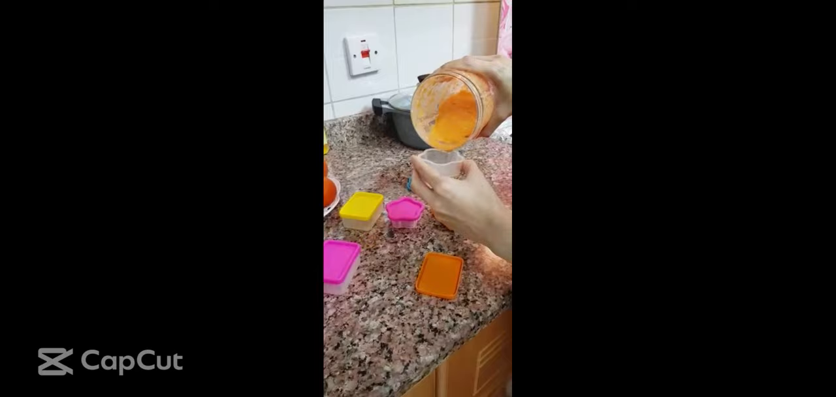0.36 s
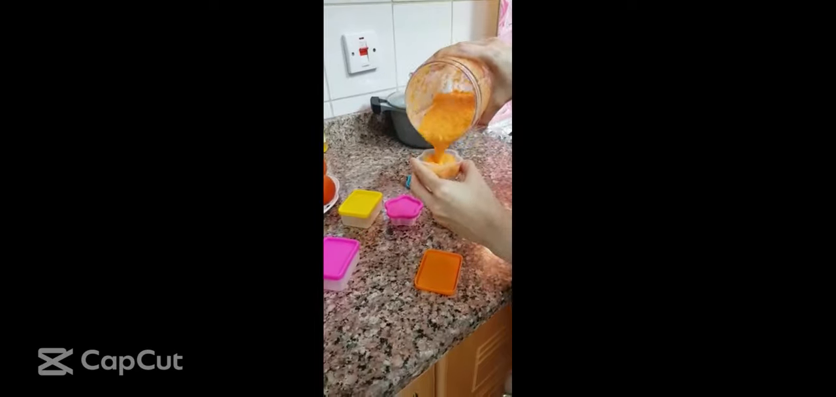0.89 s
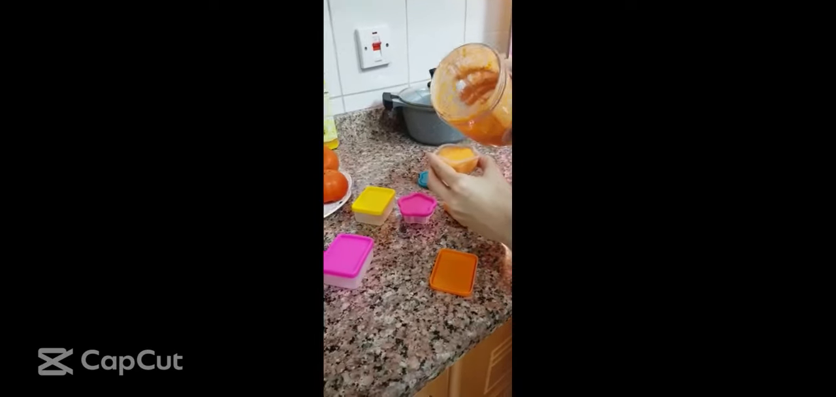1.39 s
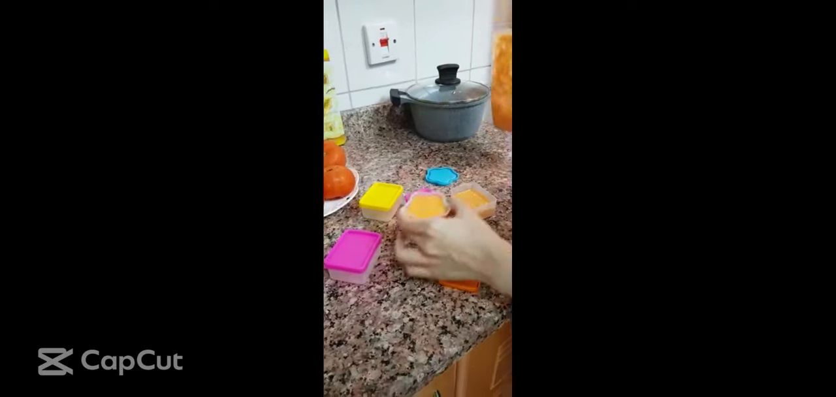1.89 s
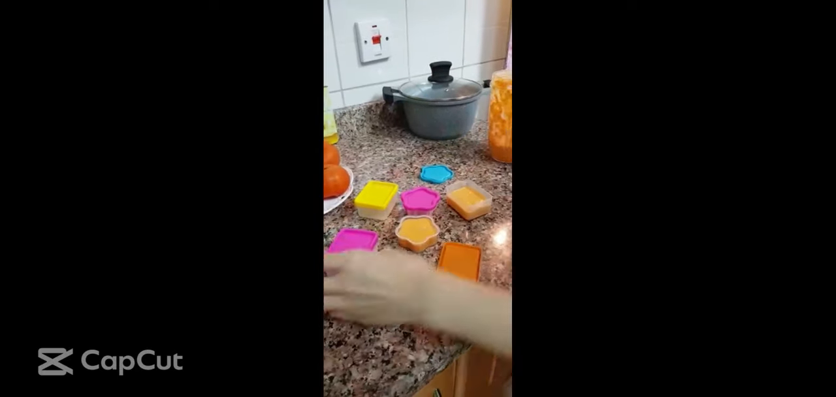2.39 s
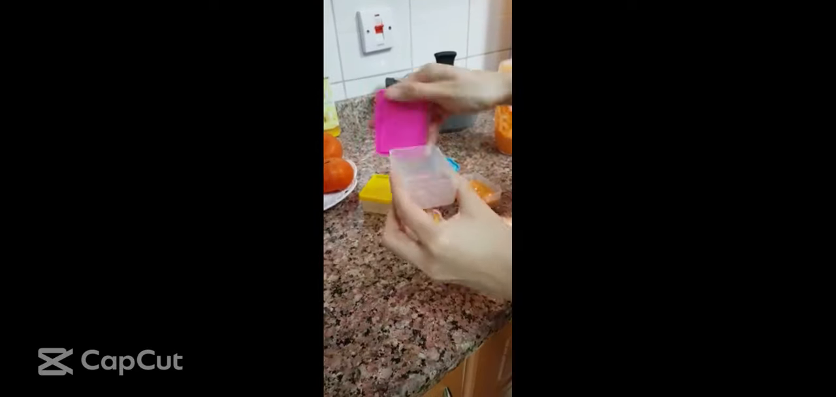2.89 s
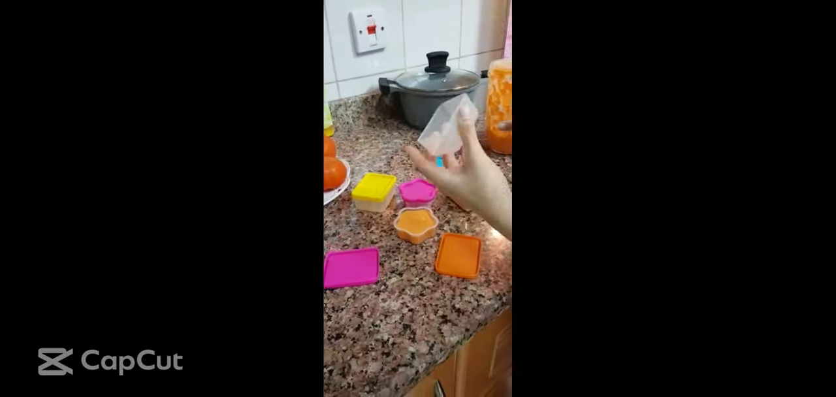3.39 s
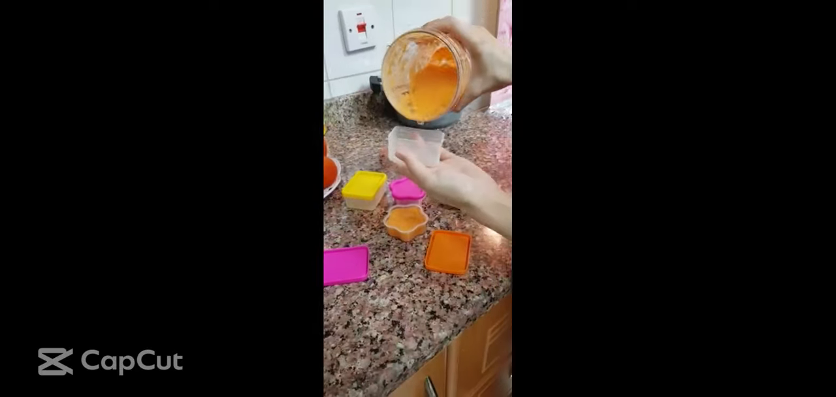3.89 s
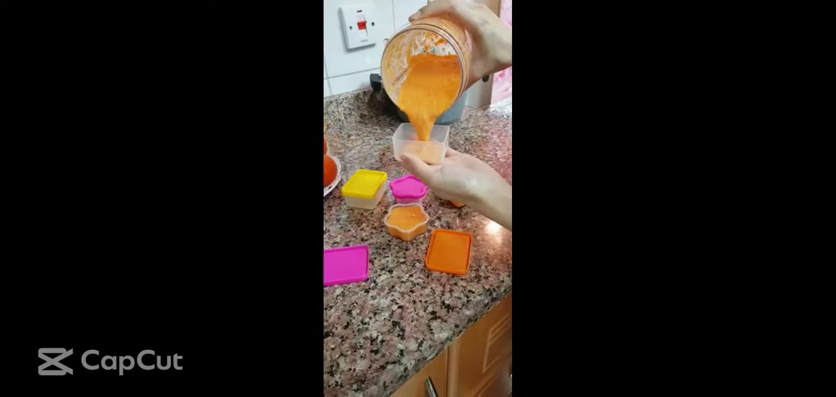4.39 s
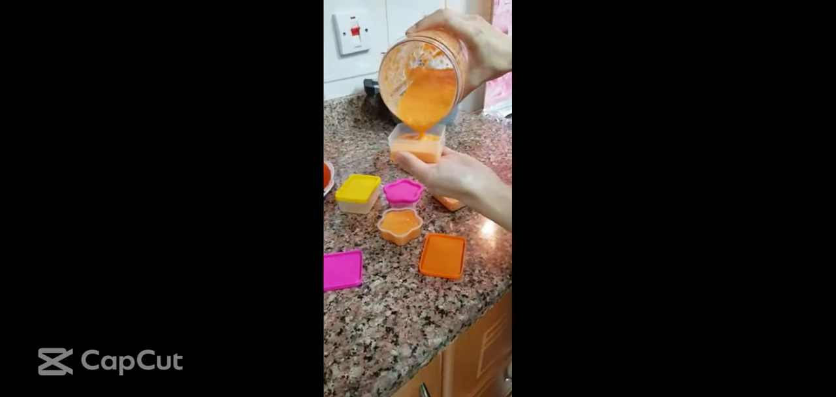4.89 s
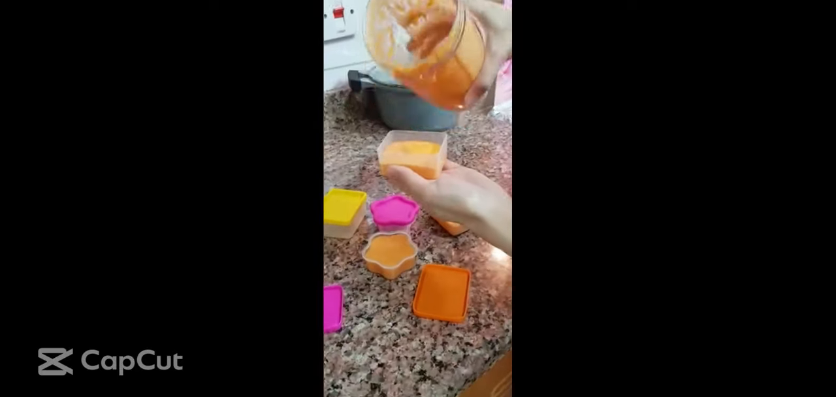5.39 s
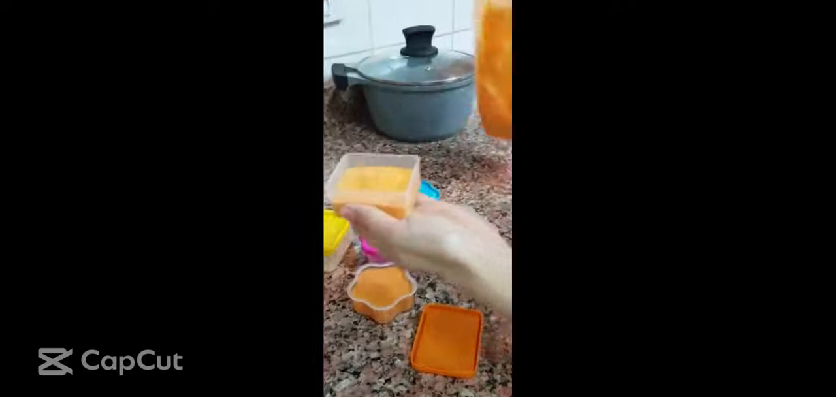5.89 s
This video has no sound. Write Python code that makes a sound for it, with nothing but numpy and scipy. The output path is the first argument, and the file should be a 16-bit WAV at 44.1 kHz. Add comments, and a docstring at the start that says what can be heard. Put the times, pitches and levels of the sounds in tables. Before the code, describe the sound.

A small tiled kitchen heard through a close phone microphone: quiet, uneven low rumble, a very faint motor hum and thin hiss throughout. Barely audible soft thumps come around 0.9 and 1.2 s. At 1.6 s a jar lands with one dull, low clunk and a little rattle. Fingers brush plastic at 2.1 s, then a tub knocks the stone in a tight hollow cluster at 2.2 s, again at 2.35 s, and lightly at 2.55 s. Around 2.9 s a box lid is prised up: a short creak rising into a sharp, loud snap at 2.95 s, louder on the left. From 3.14 to 3.4 s the lid skids and bounces in bright, dry, irregular clicks over soft thuds. Then it is nearly quiet, with a soft thump at 4.4 s, a faint airy brush at 4.65 s, a muted rub and thump at 4.95 s, and a tiny jar tap at 5.8 s.

```python
"""A small tiled room with a stone kitchen counter: hard plastic tubs, a snap lid and a jar are handled near a phone.
Each blow rings the natural tones (modes) of its object and adds a short noise crack.
Filtered noise makes the brushing fingers, the skidding lid and the creak of prising a box open.
The room answers with a dense noise tail, over soft thumps, a low rumble, a motor hum and microphone hiss."""
import sys
import numpy as np
from scipy import signal
from scipy.fft import rfft, irfft
from scipy.io import wavfile

SR = 44100
rng = np.random.default_rng(int(sys.argv[2]) if len(sys.argv) > 2 else 0)


def makeup_ratio(level_db):
    """Linear amplitude ratio for a level in decibels (20 dB per factor of ten)."""
    decades = np.asarray(level_db, float) / 20
    return 10 ** decades


def generate_wav(sig):
    """Save sig (samples, or channels by samples) to the path in sys.argv[1] as 16-bit PCM at SR."""
    pcm = np.round(np.clip(np.atleast_2d(sig).T, -1, 1) * 32767).astype(np.int16)
    wavfile.write(sys.argv[1], SR, pcm)


N = 265482  # length in samples
T = np.arange(N) / SR  # time in s
BOTH = np.array([[1], [-1]])  # opposite signs for left and right

# the lowest modes of the room: pitch_hz, width_hz (of each of two filters), level_db (relative)
ROOM_MODES = [(37.05, 34, -10.5), (68.6, 18, 2.5), (102, 40, -1.5), (129.7, 20, 2.5)]
# how alike left and right are: pitch_hz, likeness (0-1)
LIKENESS = [(30, 0.89), (130, 0.43), (300, 0.5), (650, 0)]
# tones of the plastic box: pitch_hz, level_db (relative), t60_s (time to fall 60 dB)
BOX_MODES = [(818, -4, .03), (932, 1, 0.028), (1148, 1, 0.018), (1292, 0, 0.02), (1427, 1, 0.022),
             (1740, 1, 0.045), (1921, -3, 0.022), (2167, -2, 0.02), (2852, 0, 0.03), (3050, 1, 0.035),
             (3368, 1, 0.018), (4372, 0, 0.025), (4530, 1, .02)]
# tones of the snap lid: pitch_hz, level_db (relative), t60_s (time to fall 60 dB)
LID_MODES = [(1220, -12, 0.052), (1673, -1.5, 0.018), (1800, -9, 0.13), (2214, 2.5, 0.016),
             (2320, -6, 0.038), (2493, 2.5, 0.036), (2690, -1, 0.035), (3165, 7.5, 0.0076),
             (3980, 1.5, 0.026), (4170, 4, 0.043), (6200, 6.5, 0.01503)]


def on_log(hz, table):
    """Reads a (Hz, value) table on a log-frequency axis."""
    table_hz, value = np.transpose(table)
    return np.interp(np.log(np.maximum(hz, 1)), np.log(table_hz), value)


def unit(x):
    """Scales to rms 1."""
    return x / np.sqrt(np.mean(x ** 2))


def band(x, hz, width):
    """A resonance of gain 1 at its centre."""
    return signal.lfilter(*signal.iirpeak(hz, hz / width, SR), x)


def band_twice(x, hz, width):
    """Two equal resonances in a row, which give steeper sides."""
    return band(band(x, hz, width), hz, width)


def fade(t, t60):
    """A decay that falls 60 dB in t60 seconds."""
    return np.exp(-np.log(1000) * t / t60)


def curve_gain(table):
    """Gain over time of an (s, dB) curve, silent outside it."""
    s, db = np.transpose(table)
    return makeup_ratio(np.interp(T, s, db, left=-200, right=-200))


def add(out, s, sound):
    """Mixes a stereo sound in at a moment."""
    i = int(s * SR)
    n = min(sound.shape[1], N - i)
    out[:, i:i + n] += sound[:, :n]


def pair(alike, length=N):
    """Left and right noises that share the given part of their power."""
    mid, side = rng.standard_normal((2, length))
    return np.sqrt((1 + alike) / 2) * mid + BOTH * np.sqrt((1 - alike) / 2) * side


def hiss():
    """Microphone hiss: steady noise shaped over frequency, more alike left and right in the bass."""
    # shape of the noise floor: pitch_hz, level_db (per Hz, relative)
    floor = [(25, -2.5), (50, -15.5), (65, -9.5), (123, -11), (170, -19), (205, -15), (300, -19.5),
             (590, -19.5), (900, -27), (1100, -32), (3000, -36.5), (6000, -42), (7300, -42.5), (7900, -37),
             (10500, -30.5), (15700, -30.5)]
    hz = np.fft.rfftfreq(N, 1 / SR)
    alike = np.clip(on_log(hz, LIKENESS), 0, 1)
    mid, side = rfft(rng.standard_normal((2, N))) * makeup_ratio(on_log(hz, floor))
    noise = irfft(np.sqrt(1 + alike) * mid + BOTH * np.sqrt(1 - alike) * side, N)
    return makeup_ratio(-66 + BOTH * 0.5) * unit(noise)  # left slightly louder


def hum():
    """Motor hum: narrow bands of noise waver as resonances do."""
    # hum tones: pitch_hz, width_hz, level_db (rms)
    tones = [(209.6, 19, -74), (301.2, 24, -74), (428, 71, -78), (3100, 66, -100), (7940, 22, -90)]
    return sum(makeup_ratio(db) * unit(band(pair(on_log(hz, LIKENESS)), hz, width)) for hz, width, db in tones)


def rumble():
    """Low noise rings the room modes and swells and sinks."""
    # loudness of the rumble over time: time_s, level_db (rms)
    swell = [(0.0, -62), (0.72, -64.5), (0.76, -96), (0.9, -70), (1.3, -68.5), (1.74, -57), (1.81, -69),
             (2.45, -56.5), (2.9, -60.5), (3.7, -69.5), (3.73, -58), (3.94, -68), (4.33, -63.5),
             (4.39, -56), (4.84, -79), (4.93, -59), (5.68, -66.5), (5.88, -59.5), (6.02, -77)]
    tone = sum(makeup_ratio(db) * unit(band_twice(pair(0.68), hz, width)) for hz, width, db in ROOM_MODES)
    return unit(tone) * curve_gain(swell)


def thumps():
    """Soft pushes through counter and floor set the upper two room modes going."""
    # thumps: start_s, level_db (peak of the room modes alone)
    pushes = [(0.945, -62), (1.169, -60), (2.673, -54.5), (2.75, -53.5), (2.869, -48), (3.139, -49),
              (3.178, -46.5), (3.24, -50), (4.375, -69), (4.937, -54)]
    out, t = np.zeros((2, N)), np.arange(SR // 2) / SR
    push = np.sin(np.pi * np.minimum(t / 0.0029, 1)) ** 2  # one smooth bump of 2.9 ms
    ring = sum(makeup_ratio(db) * band_twice(push, hz, 2.5 * width) / width for hz, width, db in ROOM_MODES[2:])
    sound = ring / np.abs(ring).max() + makeup_ratio(12) * band(push, 210, 110)
    for s, level_db in pushes:
        add(out, s, makeup_ratio(level_db) * np.array([sound, sound]))
    return out


def room(dry):
    """Tiles and counter return a dense tail that differs at each microphone and fades band by band."""
    # fading time of the room: pitch_hz, t60_s
    fading = [(100, .2), (500, .13), (1000, 0.16), (4000, 0.15), (14000, 0.25)]
    t = np.arange(SR // 2) / SR
    tail = np.zeros((2, len(t)))
    for hz in 120 * 2. ** np.arange(8):  # one band per octave
        noise = rng.standard_normal((2, len(t)))
        tail += band(noise, hz, hz / 0.74) * fade(t, on_log(hz, fading))
    tail *= 1 - np.exp(-(t / 0.004) ** 2)  # the echoes build up over some 4 ms
    tail /= np.sqrt(np.sum(tail ** 2, axis=1, keepdims=True))
    mono = dry.mean(axis=0, keepdims=True)
    return makeup_ratio(-7) * signal.fftconvolve(mono, tail, axes=1)[:, :N]


def brushes():
    """Fingers and rims brush plastic or stone: short bands of grainy noise."""
    # brushes: start_s, level_db (before the rise and fade), pitch_hz (centre),
    # width_hz (of each of two filters), rise_s
    strokes = [(1.608, -59, 1100, 900, 0.0086), (2.196, -52, 1500, 1500, 0.004),
               (2.13, -53, 1980, 870, 0.0005), (2.42, -68, 5160, 5000, 0.0053),
               (2.53, -60, 1010, 500, 0.012), (2.753, -66.5, 5550, 5340, 0.0064),
               (2.819, -61.5, 1340, 1500, .03), (4.565, -71, 3000, 900, .01),
               (4.61, -69, 2600, 1500, 0.011), (4.662, -48, 11370, 3600, 0.0031),
               (4.663, -65, 3250, 1210, 0.00066), (4.94, -61.5, 532, 498, 0.0059),
               (4.942, -68, 4600, 600, .003), (4.94, -63, 9140, 14000, 0.012),
               (5.029, -68, 11200, 6000, 0.01)]
    out, t = np.zeros((2, N)), np.arange(SR // 2) / SR
    for s, db, hz, width_hz, rise in strokes:
        grain = pair(0.067, len(t)) * makeup_ratio(1.2 * rng.exponential(size=len(t)))
        t60 = 0.12 + 7 * rise  # a brush that starts slowly also dies slowly
        shape = (1 - np.exp(-t / rise)) * fade(t, t60)
        add(out, s, makeup_ratio(db) * shape * unit(band_twice(grain, hz, width_hz)))
    return out


def rub(modes, curve, slope_db, hiss_hz, hiss_db):
    """Dense tiny contacts of uneven size keep an object ringing, most near a centre that moves."""
    s, level_db, centre_hz = np.transpose(curve)
    contacts = rng.standard_normal((2, N)) * makeup_ratio(3 * rng.exponential(size=N))
    centre = np.interp(T, s, centre_hz)
    ring = np.zeros((2, N))
    for hz, db, t60 in modes:
        gain = makeup_ratio(db - slope_db * np.abs(np.log2(hz / centre)))  # slope in dB per octave
        ring += gain * band(contacts, hz, 2.2 / t60) * np.sqrt(t60)
    scrape = makeup_ratio(hiss_db) * unit(band(contacts, hiss_hz, 4.3 * hiss_hz))
    return (unit(ring) + scrape) * curve_gain(np.transpose([s, level_db]))


def box_prise():
    """The box lid creaks over its rim while it is prised off: tiny contacts ring the box."""
    # creak: time_s, level_db (gain on a ring of rms 1), pitch_hz (centre)
    creak = [(2.86, -59, 763), (2.89, -59.5, 918), (2.92, -59, 1013), (2.932, -48.5, 1300),
             (2.95, -41.5, 1500), (2.976, -56, 1489), (3.039, -61, 1500)]
    return rub(BOX_MODES, creak, slope_db=16.5, hiss_hz=4000, hiss_db=-25.5)


def lid_skid():
    """The lid skids between bounces, and the region it rings in shifts as it tilts."""
    # skid: time_s, level_db (gain on a ring of rms 1), pitch_hz (centre)
    skid = [(3.119, -79.5, 2300), (3.143, -48, 2300), (3.2, -44, 2700), (3.23, -56, 2700),
            (3.286, -58, 2300), (3.301, -44, 2500), (3.333, -40, 2600), (3.345, -54, 2400),
            (3.358, -42, 2350), (3.46, -62, 2100)]
    return rub(LID_MODES, skid, slope_db=34, hiss_hz=5040, hiss_db=-13)


def blows(table, modes, pan_db, slope_db, split, spread, crack_s, crack_hz, push_turns, tail_db, tail_s):
    """Each blow rings the modes, those near its own region most, under a short crack with a rattling tail.

    slope_db is per octave, split a share of the pitch, spread in radians, push_turns in cycles of the region."""
    out, t = np.zeros((2, N)), np.arange(SR // 6) / SR
    # uneven walls and gripping fingers split every mode into a main line and two weaker neighbours
    hz, db, t60 = np.repeat(modes, 3, axis=0)[:, :, None].transpose(1, 0, 2)
    place = np.tile([0, -1, 1], len(modes))[:, None]
    db = db - 9.5 * np.abs(place)
    crack_shape = np.exp(-t / crack_s) + makeup_ratio(tail_db) * np.exp(-t / tail_s)
    for s, peak_db, region_hz, crack_db in table:
        # a softer contact pushes longer and sounds lower
        rise = 1 - np.exp(-(t * region_hz / push_turns) ** 2)
        gain = makeup_ratio(db - slope_db * np.abs(np.log2(hz / region_hz)))
        pitch = hz * (1 + split * place * (1 + rng.random(hz.shape)))
        # a mode radiates unevenly, so the two microphones catch it in different phase
        sign = np.repeat(rng.choice([-1, 1], len(modes)), 3)[:, None]
        lead = spread * sign * BOTH[:, :, None]
        lines = gain * fade(t, t60) * np.sin(2 * np.pi * pitch * t + lead)
        ring = np.sum(lines, axis=1) * rise
        # tiny contacts of uneven size make the crack
        contacts = pair(0.16, len(t)) * makeup_ratio(2 * rng.exponential(size=len(t)))
        crack = unit(band_twice(contacts, crack_hz, 2.5 * crack_hz)) * crack_shape * rise
        sound = ring / np.abs(ring).max() + makeup_ratio(crack_db) * crack
        add(out, s, makeup_ratio(peak_db + BOTH * pan_db / 2) * sound)  # positive pan_db: left louder
    return out


def jar_blows():
    """The jar rings a few low tones with a lasting rattle."""
    # tones of the jar: pitch_hz, level_db (relative), t60_s
    jar_modes = [(435, -22, 0.08), (530, -7, 0.07), (950, -9, 0.03), (1060, -6, 0.05), (2200, -10, 0.04),
                 (2850, -12, .05)]
    # blows: start_s, level_db (ring peak before panning), pitch_hz (strongest region), crack_db (relative)
    hits = [(1.6262, -33, 1050, -17), (1.6268, -32, 526, -20), (5.775, -54.5, 530, -16.5)]
    return blows(hits, jar_modes, pan_db=-1.5, slope_db=12, split=0.0055, spread=0.33,
                 crack_s=0.0029, crack_hz=1850, push_turns=1.38, tail_db=-3.5, tail_s=0.018)


def tub_blows():
    """The tub rings many close tones, down to a low boom."""
    # tones of the tub: pitch_hz, level_db (relative), t60_s
    tub_modes = [(138, 0, 0.09), (223, -12, 0.07), (356, 2, 0.09), (393, -1, 0.13), (452, -5, .08),
                 (514, 2, .08), (576, -1, .1), (620, 0, 0.08), (727, 0, 0.08), (835, -1, 0.08),
                 (1070, -2, 0.1), (1320, -3, 0.035), (1750, -7, .03), (2250, -2, 0.04), (3130, -6, 0.03)]
    # blows: start_s, level_db (ring peak before panning), pitch_hz (strongest region), crack_db (relative)
    hits = [(2.2128, -26, 1400, -6), (2.219, -32, 600, -18), (2.224, -26, 500, -17), (2.229, -37, 140, -17),
            (2.231, -29, 356, -16), (2.241, -32, 500, -16), (2.251, -33, 393, -20), (2.272, -40, 393, -18),
            (2.3465, -25, 660, -24), (2.351, -35, 140, -26), (2.361, -34, 600, -26),
            (2.554, -43, 1070, -30), (2.556, -41, 452, -34)]
    return blows(hits, tub_modes, pan_db=2, slope_db=14, split=0.012, spread=0.49,
                 crack_s=0.00059, crack_hz=1350, push_turns=0.85, tail_db=-11, tail_s=0.03)


def box_blows():
    """The box rings short, high tones, louder on the left."""
    # blows: start_s, level_db (ring peak before panning), pitch_hz (strongest region), crack_db (relative)
    hits = [(2.8645, -48, 700, -14), (2.895, -37, 850, -24), (2.898, -26, 880, -20),
            (2.904, -31, 2900, -10), (2.9335, -28, 1150, -24), (2.938, -34, 2600, -18),
            (2.9412, -18, 1450, -19), (2.950, -13.5, 1550, -21), (2.957, -28, 1800, -18),
            (2.963, -33, 1300, -22), (2.971, -31, 1900, -18), (2.985, -35, 1800, -20),
            (2.997, -37, 1700, -22)]
    return blows(hits, BOX_MODES, pan_db=6, slope_db=8.5, split=0.0049, spread=0.9,
                 crack_s=0.0015, crack_hz=5660, push_turns=0.7, tail_db=-9.5, tail_s=0.012)


def lid_blows():
    """The lid bounces and rings bright tones at each blow."""
    # blows: start_s, level_db (ring peak before panning), pitch_hz (strongest region), crack_db (relative)
    hits = [(3.1425, -31, 1600, -7), (3.1742, -29, 3300, -10), (3.1757, -23, 2700, -9),
            (3.181, -27, 2500, -12), (3.1855, -26, 2500, -16), (3.201, -36, 2750, -15),
            (3.2415, -28, 1700, -10), (3.2485, -27, 3400, -16), (3.254, -27, 2750, -20),
            (3.305, -25, 2300, -10), (3.318, -34, 2500, -17), (3.324, -33, 2510, -19.5),
            (3.359, -19.5, 2200, -11), (3.3625, -28, 4000, -15), (3.365, -26, 4100, -17),
            (3.374, -33, 2300, -17), (3.395, -22, 1650, -11), (3.403, -27, 1750, -18)]
    return blows(hits, LID_MODES, pan_db=1.9, slope_db=10, split=0.015, spread=0.46,
                 crack_s=0.0013, crack_hz=5600, push_turns=0.65, tail_db=-37, tail_s=0.043)


def scene():
    """All handling sounds in the room, over the thumps and the background."""
    background = rumble() + hum() + hiss()
    rubbing = brushes() + box_prise() + lid_skid()
    near = rubbing + jar_blows() + tub_blows() + box_blows() + lid_blows()
    return near + room(near) + thumps() + background


def roll_off(x):
    """The treble ends steeply here."""
    return signal.sosfilt(signal.butter(12, 16660, fs=SR, output="sos"), x)


def record(dry):
    """The phone cuts the deepest bass and the top."""
    bass_cut = signal.butter(2, 45, "high", fs=SR, output="sos")
    top_cut = signal.ellip(8, 0.2, 40, 15800, fs=SR, output="sos")
    mix = signal.sosfilt(np.vstack([bass_cut, top_cut]), dry)
    return roll_off(mix)


dry = scene()
out = record(dry)
generate_wav(out)
```